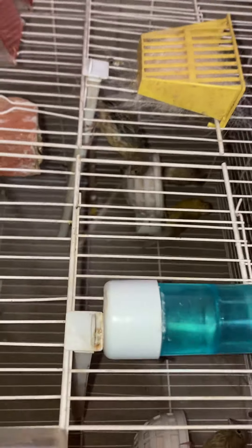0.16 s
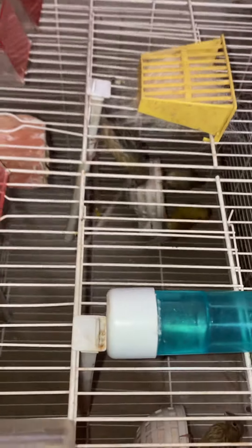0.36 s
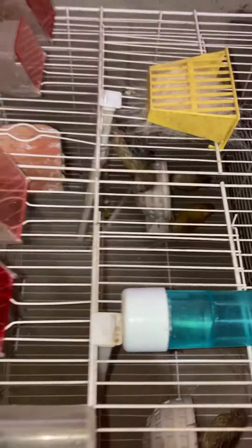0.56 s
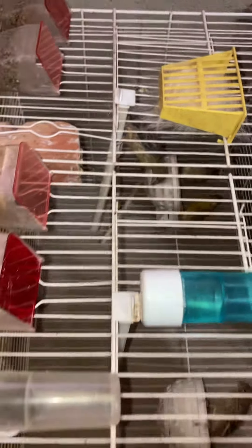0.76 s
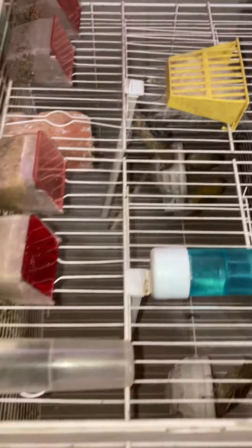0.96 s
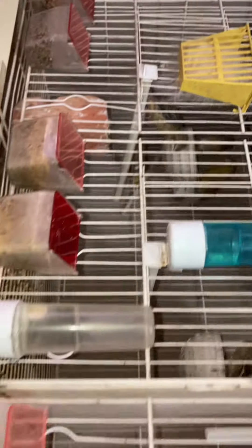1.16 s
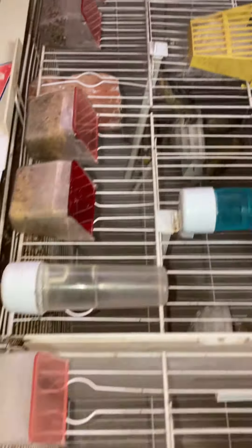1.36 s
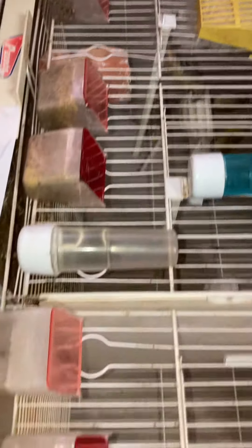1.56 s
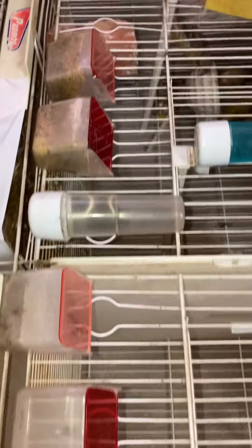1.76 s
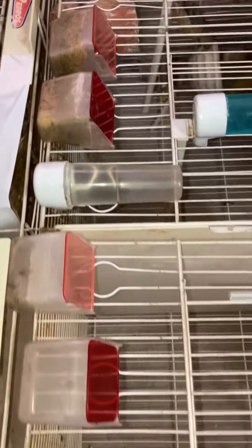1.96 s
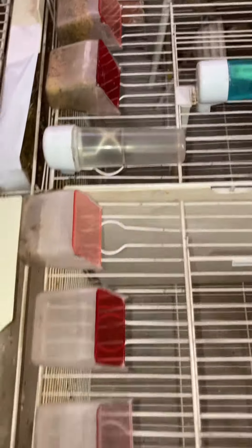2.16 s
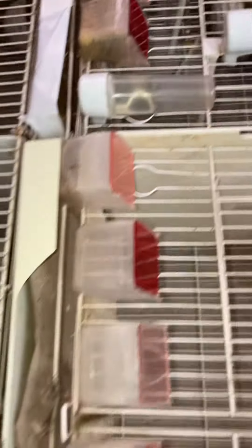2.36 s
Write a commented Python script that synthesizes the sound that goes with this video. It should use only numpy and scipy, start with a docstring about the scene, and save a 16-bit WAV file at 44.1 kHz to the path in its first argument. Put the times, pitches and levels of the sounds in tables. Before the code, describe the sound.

Caged canaries call in a hard-walled room: soft peeps, then rising held whistles and a run of short falling chirps. Cloth rustles and soft bumps come from someone moving with the microphone, over a low hum.

```python
"""A hard-walled breeding room, where caged canaries call. One repeats a short falling chip, others
slide up into held whistles or give soft peeps, and one twitters far off. Each note is a wavering
tone, most with fainter tones above it (harmonics), and the room echoes it. Claws tick on cage wire.
Someone shuffles along the cages with the microphone, adding noisy rustles, rumble and soft bumps,
all over a low room hum."""
import sys
import numpy as np
from scipy import signal
from scipy.fft import rfft, irfft, next_fast_len
from scipy.io import wavfile
from scipy.ndimage import uniform_filter1d, map_coordinates

SR = 44100
rng = np.random.default_rng(int(sys.argv[2]) if len(sys.argv) > 2 else 0)


def wav_record(signal):
    """Record a signal, one row per channel, as 16-bit PCM in the file named by sys.argv[1]."""
    frames = np.transpose(np.atleast_2d(signal))
    bounded = np.clip(frames, -1, 1)
    # unit amplitude maps onto the largest positive 16-bit level
    quanta = np.round(bounded * 32767).astype(np.int16)
    wavfile.write(sys.argv[1], SR, quanta)


N = 110250

# Falling chips: start_s, length_s, first_hz, last_hz, level_db, harmonic2_db, harmonic3_db, echo_db
CHIP_NOTES = [(0.413, 0.041, 5085, 4420, -39, -22, -20.5, 5), (0.542, 0.039, 4952, 4160, -37, -24, -25, 8),
              (0.677, 0.065, 4723, 4260, -35, -20.5, -24, 2),
              (1.232, 0.063, 5440, 4750, -46, -27.5, -21.5, 9),
              (1.378, 0.038, 5383, 4457, -30, -26.5, -33, 0.5),
              (1.491, 0.047, 5270, 4180, -36, -30, -27.5, 6.5),
              (1.626, 0.032, 5107, 4456, -25, -30.5, -30, -2),
              (1.744, .04, 4998, 4292, -28.5, -28, -26, 2.5),
              (1.867, 0.043, 4803, 4314, -26.5, -26.5, -26, -3.5),
              (1.98, 0.045, 4903, 4194, -29.5, -25.5, -28, 2),
              (2.123, 0.043, 4767, 4070, -27.5, -28.5, -23, -1)]
# The path each whistle follows: time_s, pitch_hz, level_db
SLOW_PATH = [(0.621, 1252, -71), (.668, 2653, -40.5), (0.698, 2926, -40.5), (0.754, 3091, -44),
             (.80, 3123, -36.5), (.86, 3079, -39.5), (0.914, 3010, -58)]
ANSWER_PATH = [(.792, 3274, -43), (0.81, 3408, -42), (.835, 3375, -38.5), (0.869, 3410, -44),
               (.912, 3386, -37), (.955, 3297, -41)]
NEAR_PATH = [(.99, 1324, -59), (1.01, 2700, -48), (1.028, 3560, -54), (1.052, 3945, -39.5),
             (1.082, 4166, -36), (1.10, 4180, -28), (1.135, 4172, -24.5), (1.19, 4179, -32.5),
             (1.235, 4193, -48)]
# Voices of the slow, answering and near whistle:
# harmonic2_db, harmonic3_db, harmonic4_db, echo_db, waver_share, lean_left_db
WHISTLE_VOICES = [(-8, -18.5, -17, -1, 0.0033, 0.3), (-33, -27.5, -29.5, 2, 0.0099, 0),
                  (-28.5, -29, -53.5, -20, .00094, 4)]
# Puffs of air as whistles begin: start_s, level_db
AIR_PUFFS = [(0.611, -41), (0.989, -53)]
# Peeps: start_s, length_s, first_hz, last_hz, level_db, echo_db, waver_share
PEEP_NOTES = [(0.139, 0.036, 2886, 2760, -54, 8, 0.047), (.214, 0.032, 3660, 3678, -32, -3, 0.0032),
              (0.247, 0.026, 3678, 3650, -37, -6, 0.004), (0.207, 0.094, 2996, 3464, -52, 6.5, 0.051),
              (0.288, 0.0492, 3614, 3812, -33.5, 1.5, 0.024), (0.336, .021, 3690, 3710, -30.5, -19, 0.0094),
              (0.386, 0.063, 2536, 2543, -53.5, -4, .02)]
# The voice of a peep: harmonic2_db, harmonic3_db
PEEP_VOICE = [-33.5, -30]
# Far twitter: start_s, length_s, first_hz, last_hz, level_db
TWITTER_NOTES = [(1.658, 0.031, 3100, 2340, -56.5), (1.683, .038, 2184, 1966, -46),
                 (1.718, 0.031, 2460, 2460, -50), (1.744, 0.024, 2680, 2910, -49),
                 (1.915, 0.034, 2267, 2002, -43), (1.955, 0.035, 1890, 2370, -57),
                 (1.975, 0.031, 2400, 2800, -47), (1.99, 0.019, 2060, 2100, -64),
                 (2.065, 0.029, 2260, 2340, -47.5), (2.092, 0.026, 2880, 3140, -44.5),
                 (2.455, 0.073, 2050, 2210, -52)]
# Claws on the wire: start_s, level_db
CLAW_TICKS = [(.467, -55.5), (1.859, -38.5)]
# Brushes of cloth: start_s, level_db, fade_s (a fade time is how long a 60 dB drop takes)
CLOTH_STROKES = [(.035, -55.5, 0.63), (0.119, -47.5, 0.96), (1.1, -47.5, 0.84), (1.15, -43.5, 0.43),
                 (1.742, -53.5, 1), (1.858, -49.5, 0.42), (2.233, -42.5, 0.2), (2.288, -39.5, 0.45),
                 (2.365, -50, 0.63)]
# Bumps of the hand on the microphone: middle_s, pitch_hz, level_db
HAND_BUMPS = [(.01, 70, -48.5), (0.313, 55, -39), (1.772, 62, -43.5), (2.039, 75.5, -60)]
# How the shuffling and the hand's rumble rise and fall: time_s, level_db
SHUFFLE_LEVELS = [(0.0, -101), (0.01, -61.5), (0.1, -48.5), (0.41, -58.5), (0.58, -64.5), (0.65, -66),
                  (0.79, -63.5), (0.93, -55), (0.95, -57), (1.22, -47), (1.66, -64), (1.71, -52.5),
                  (1.91, -45), (2.12, -58.5), (2.3, -44), (2.31, -42.5), (2.43, -43.5), (2.5, -50)]
RUMBLE_LEVELS = [(0.0, -56), (0.05, -58.5), (0.1, -51.5), (0.27, -53), (0.28, -50.5), (0.79, -65.5),
                 (0.89, -54.5), (1.06, -64.5), (1.27, -50), (1.68, -60.5), (1.75, -53), (1.98, -50),
                 (2.17, -54.5), (2.5, -49.5)]
# The tones of the room's hum: pitch_hz, level_db
HUM_TONES = [(66, -75.5), (135, -70)]

# The colour of each noise, or how strong its lows and highs are: frequency_hz, gain_db
WASH_EQ = [(2000, -7.5), (5800, -21.5), (7200, -4.5), (9300, 3.5), (12500, -9.5), (14500, 0)]
PUFF_EQ = [(900, -46), (1400, 4), (2800, 2.5), (4200, 10), (6000, -7.5), (12000, -14)]
CLAW_EQ = [(2000, -45), (6000, 8.5), (15000, 17)]
SHUFFLE_EQ = [(90, -33), (170, 0.5), (400, -0.5), (560, -4.5), (850, 1), (1300, 0.5), (2500, -5.5),
              (3500, -11), (4600, -12.5), (7000, -49.5)]
CLOTH_EQ = [(800, -4), (2500, -6.5), (5500, -5.5), (7500, -0.5), (9500, -3), (12000, -4), (15500, -6)]
RUMBLE_EQ = [(22, -47), (33, -17), (45, -8), (65, 7), (100, -5.5), (135, 3.5), (180, -3), (260, -2),
             (400, -4.5), (800, -8), (3000, -64.5)]
AIR_EQ = [(25, -26), (60, -43), (200, 4), (1000, -13), (4000, -15), (6000, -29), (9000, -11.5),
          (15000, -40.5)]
# The brightness of the echo, and the microphone's dip in the treble: frequency_hz, gain_db
ECHO_EQ = [(5000, 3), (9000, 5), (15000, 13)]
MIC_EQ = [(10400, -1), (11100, -12), (11700, -39.5), (12300, -17.5), (13300, -5.5)]
# How long the room rings: frequency_hz, fade_s
ECHO_FADES = [(300, 0.15), (3000, 0.6), (5000, 0.47), (10000, 0.39), (15000, 0.22)]
# How alike left and right are in echo and noise: frequency_hz, likeness (1 same, -1 opposite)
ECHO_LIKENESS = [(300, 0.83), (1500, 0.65), (3000, -0.41), (5000, -0.23), (9000, 0.65)]
NOISE_LIKENESS = [(100, 0.87), (300, 1), (700, 0.21), (2000, 0.25), (5000, 0.1), (9000, 0.24)]

NOTE_SAMPLES = SR // 3
SIDES = np.array([[1], [-1]])  # plus for the left, minus for the right


def chips():
    """A canary's chips swell and fade as their pitch drops, leaving a faint bright wash in the room."""
    wash_db, wash_fade_s = -19.5, 0.53
    out, wash = np.zeros((2, N)), np.zeros(N)
    for start_s, length_s, first_hz, last_hz, level_db, *voice_db, echo_db in CHIP_NOTES:
        done = progress(length_s)
        pitch = first_hz + (last_hz - first_hz) * done ** 1.098
        loudness = amp(level_db) * np.abs(arch(done, peak=0.57)) ** 0.71
        overtones = harmonics(voice_db) + [(1.5, -35.5)]  # a faint extra tone between harmonics
        sing(out, start_s, pitch, loudness, overtones, echo_db, waver=0.0067)
        age = since(start_s)
        fade_db = 60 * age / wash_fade_s
        wash += amp(level_db + echo_db + wash_db - fade_db) * np.minimum(age / length_s, 1)
    return out + wash * noise(WASH_EQ)


def whistles():
    """Canaries slide up to a held note. The voice rasps while low and clears near its top pitch."""
    edge_s = 0.0045  # time for the voice to start or stop
    out = np.zeros((2, N))
    for path, voice in zip([SLOW_PATH, ANSWER_PATH, NEAR_PATH], WHISTLE_VOICES):
        *voice_db, echo_db, waver, lean_left_db = voice
        times, path_hz, path_db = np.transpose(path)
        start_s, end_s = times[0], times[-1]
        t = start_s + np.arange(NOTE_SAMPLES) / SR
        pitch = np.interp(t, times, path_hz)
        below_top = np.abs(1 - pitch / path_hz.max())
        rasp = 0.1334 * below_top ** 0.646 * wobble(670, len(t))
        gate = np.interp(t, [start_s, start_s + edge_s, end_s - edge_s, end_s], [0, 1, 1, 0])
        shimmer_db = 1.56 * wobble(65.7, len(t))
        loudness = gate * amp(np.interp(t, times, path_db) + shimmer_db)
        overtones = harmonics([*voice_db, voice_db[-1] - 10.5])  # adds a weaker fifth harmonic
        whistle = np.zeros((2, N))
        sing(whistle, start_s, pitch * (1 + rasp), loudness, overtones, echo_db, waver)
        out += whistle * amp(SIDES * lean_left_db)
    return out


def puffs():
    """An airy hiss comes as a rising whistle begins."""
    rise_s = 0.038
    loudness = np.zeros(N)
    for start_s, level_db in AIR_PUFFS:
        rise = since(start_s) / rise_s
        loudness += amp(level_db) * rise * np.exp(1 - rise)
    return loudness * noise(PUFF_EQ)


def peeps():
    """Canaries keep in touch with soft calls, most of them nearly level in pitch."""
    out = np.zeros((2, N))
    for start_s, length_s, first_hz, last_hz, level_db, echo_db, waver in PEEP_NOTES:
        done = progress(length_s)
        pitch = first_hz + (last_hz - first_hz) * done
        loudness = amp(level_db) * arch(done, peak=0.84)
        sing(out, start_s, pitch, loudness, harmonics(PEEP_VOICE), echo_db, waver)
    return out


def twitter():
    """A bird in a far cage sings low, quick notes that flicker in loudness."""
    out = np.zeros((2, N))
    for start_s, length_s, first_hz, last_hz, level_db in TWITTER_NOTES:
        done = progress(length_s)
        pitch = first_hz + (last_hz - first_hz) * done
        flicker_db = 4.5 * wobble(173, len(done))
        loudness = amp(level_db + flicker_db) * arch(done, peak=0.32)
        sing(out, start_s, pitch, loudness, overtones=[], echo_db=-1, waver=0.04)
    return out


def claws():
    """Claws tap the cage wire: tiny, dry bursts of bright noise."""
    fade_s = 0.021
    loudness = np.zeros(N)
    for start_s, level_db in CLAW_TICKS:
        loudness += amp(level_db - 60 * since(start_s) / fade_s) * (clock() >= start_s)
    return loudness * noise(CLAW_EQ)


def shuffling():
    """Someone moves along the cages with a dull rustle that comes and goes."""
    level_db = np.interp(clock(), *np.transpose(SHUFFLE_LEVELS))
    return amp(level_db + 0.17 * wobble(35.8, N)) * noise(SHUFFLE_EQ)


def cloth():
    """Each brush of cloth is a hiss that starts quickly and dies away."""
    rise_s = 0.01
    strokes = np.zeros(N)
    for start_s, level_db, fade_s in CLOTH_STROKES:
        age = since(start_s)
        strokes += amp(level_db - 60 * age / fade_s) * (1 - np.exp(-age / rise_s))
    return strokes * amp(1.1 * wobble(150, N)) * noise(CLOTH_EQ)


def handling():
    """A hand on the microphone makes a low rumble and a few soft bumps."""
    bump_width_s = 0.012
    t = clock()
    rumble = amp(np.interp(t, *np.transpose(RUMBLE_LEVELS))) * noise(RUMBLE_EQ)
    bumps = np.zeros(N)
    for middle_s, pitch_hz, level_db in HAND_BUMPS:
        swell = np.exp(-((t - middle_s) / bump_width_s) ** 2)
        bumps += amp(level_db) * swell * np.sin(2 * np.pi * pitch_hz * (t - middle_s))
    return lean_left(rumble + bumps, lean_db=1.83, lead_s=0.00042)


def room_tone():
    """The room hums unsteadily, more on the left, over a faint rush of air."""
    hum = np.zeros(N)
    for pitch_hz, level_db in HUM_TONES:
        phase = 2 * np.pi * pitch_hz * clock() + 0.3 * wobble(26, N)
        hum += amp(level_db) * np.sqrt(2) * np.sin(phase)
    return hum * amp(SIDES * 1.8) + amp(-63) * noise(AIR_EQ)


def sing(out, start_s, pitch, loudness, overtones, echo_db, waver):
    """Add one bird note and its echo to out. Each overtone is (pitch_multiple, level_db)."""
    size = len(pitch)
    unsteady_hz = pitch * (1 + waver * wobble(260, size))
    phase = 2 * np.pi * np.cumsum(unsteady_hz) / SR
    tone = np.sin(phase)
    for multiple, level_db in overtones:
        flutter_db = 4.5 * wobble(150, size)
        in_range = multiple * pitch < SR / 2
        tone += amp(level_db + flutter_db) * np.sin(multiple * phase) * in_range
    note = np.sqrt(2) * loudness * tone
    heard = amp(echo_db) * signal.fftconvolve(note[None], room_echo(), axes=1)
    heard[:, :size] += note
    at = round(start_s * SR)
    out[:, at:at + heard.shape[1]] += heard[:, :N - at]


def room_echo():
    """The hard walls answer a click with fading noise that rings longest near 3000 Hz."""
    delay_s, build_s = 0.0024, 0.0027
    hz, t, bands = signal.stft(stereo_noise(ECHO_LIKENESS, SR * 3 // 4), SR, nperseg=256)
    fade = amp(-60 * t / look_up(ECHO_FADES, hz)[:, None])
    tail = signal.istft(bands * fade, SR, nperseg=256)[1]
    age = np.maximum(np.arange(tail.shape[1]) / SR - delay_s, 0)
    tail *= 1 - np.exp(-age / build_s)
    echo = tail / np.linalg.norm(tail[0]) + first_echoes(tail.shape[1])
    return filtered(echo / np.linalg.norm(echo[0]), lambda hz: amp(look_up(ECHO_EQ, hz)))


def first_echoes(size, count=5, within_s=0.02):
    """A few early bounces off cage trays and walls reach each side at different times."""
    echoes = np.zeros((2, size))
    for side in echoes:
        delays_s = rng.uniform(0.062, 1, count) * within_s
        side[(delays_s * SR).astype(int)] = 0.053 * rng.choice([-1, 1], count)
    return echoes


def noise(colour, patchy_db=3.5):
    """Coloured stereo noise, with louder and softer patches across time and pitch."""
    bands = signal.stft(stereo_noise(NOISE_LIKENESS, N), nperseg=1024)[2]
    patches = uniform_filter1d(rng.standard_normal(bands.shape[1:]), size=3, axis=0)
    patches = uniform_filter1d(patches, size=6, axis=1)
    patchy = signal.istft(bands * amp(patchy_db * unit(patches)), nperseg=1024)[1][:, :N]
    return unit(filtered(patchy, lambda hz: amp(look_up(colour, hz))))


def stereo_noise(likeness, size):
    """White noise whose left and right are partly alike."""
    def shares(hz):
        angle = np.arccos(np.clip(look_up(likeness, hz), -1, 1)) / 2
        return np.array([np.cos(angle), np.sin(angle)])
    shared, opposite = filtered(rng.standard_normal((2, size)), shares)
    return np.array([shared + opposite, shared - opposite])


def lean_left(sound, lean_db, lead_s):
    """Turn the left up and the right down by lean_db, and let the left arrive lead_s sooner."""
    return filtered(sound, lambda hz: amp(SIDES * lean_db) * np.exp(1j * np.pi * hz * SIDES * lead_s))


def filtered(sound, gain_at):
    """Multiply each frequency in the sound by gain_at(hz)."""
    size = next_fast_len(sound.shape[-1] + 8192)
    hz = np.fft.rfftfreq(size, 1 / SR)
    return irfft(rfft(sound, size) * gain_at(hz), size)[..., :sound.shape[-1]]


def wobble(rate_hz, size):
    """A smooth curve through rate_hz random values a second."""
    return map_coordinates(rng.standard_normal(4096), [np.arange(size) * rate_hz / SR], mode="wrap")


def harmonics(levels_db):
    """Pair the levels with 2, 3, 4... times the pitch."""
    return list(enumerate(levels_db, 2))


def progress(length_s):
    """How much of a note is done: runs from 0 to 1, then stays at 1."""
    return np.minimum(np.arange(NOTE_SAMPLES) / SR / length_s, 1)


def arch(done, peak):
    """A swell and fade, highest when done reaches peak."""
    return np.sin(np.pi * np.interp(done, [0, peak, 1], [0, 0.5, 1]))


def look_up(table, hz):
    """Read between the rows of a (frequency_hz, value) table, with octaves evenly spaced."""
    row_hz, values = np.transpose(table)
    return np.interp(np.log(hz + 1), np.log(row_hz + 1), values)


def clock():
    """The time of every sample, in seconds."""
    return np.arange(N) / SR


def since(start_s):
    """Seconds since start_s, and zero before it."""
    return np.maximum(clock() - start_s, 0)


def amp(db):
    """Turn decibels into a gain."""
    return 10 ** (np.asarray(db) / 20)


def unit(x):
    """Scale to an average strength (rms) of 1."""
    return x / np.sqrt(np.mean(x ** 2) + 1e-20)


def scene():
    """The birds, a little to the left, over the sounds of movement and the room."""
    birds = chips() + whistles() + puffs() + peeps() + twitter()
    birds = lean_left(birds, lean_db=0.12, lead_s=0.000015)
    return birds + claws() + shuffling() + cloth() + handling() + room_tone()


def record(dry):
    """The microphone dips in one narrow treble band and hears nothing above top_hz."""
    top_hz = 15850
    return filtered(dry, lambda hz: amp(look_up(MIC_EQ, hz)) * (hz < top_hz))


dry = scene()
out = record(dry)
wav_record(out)
```